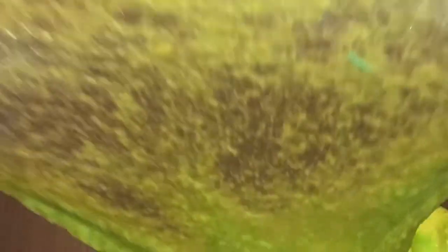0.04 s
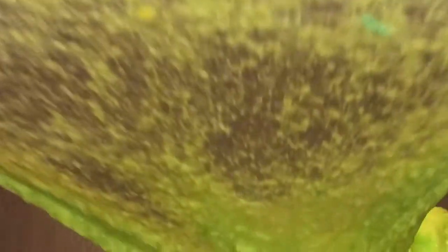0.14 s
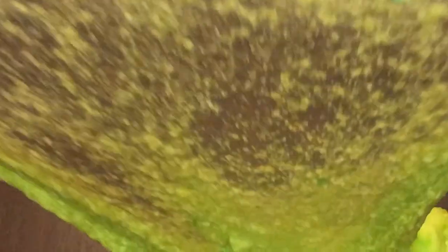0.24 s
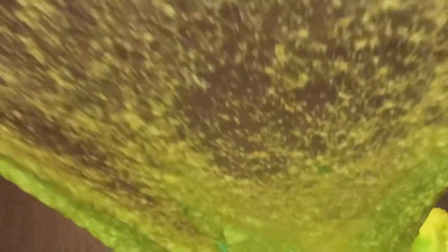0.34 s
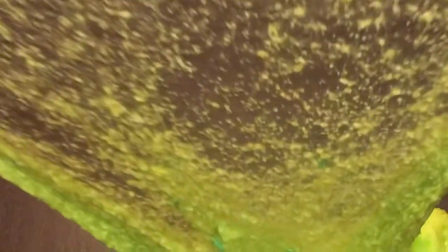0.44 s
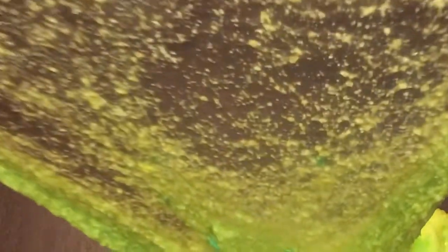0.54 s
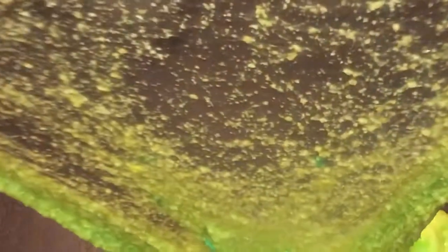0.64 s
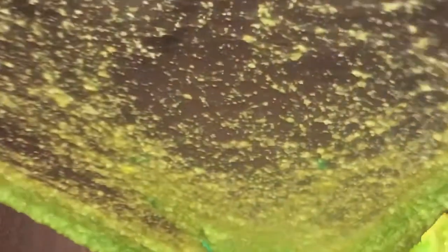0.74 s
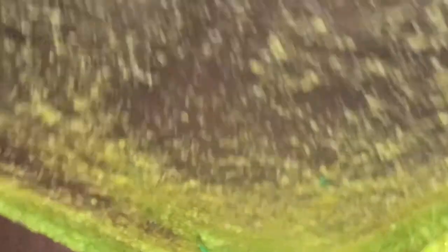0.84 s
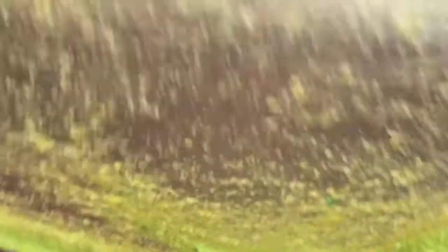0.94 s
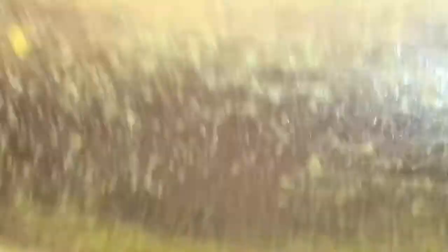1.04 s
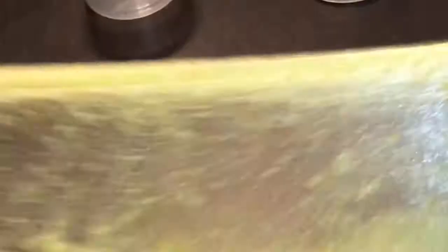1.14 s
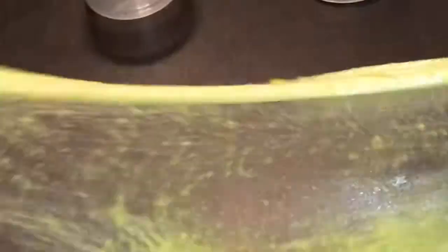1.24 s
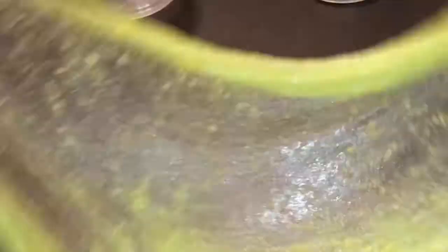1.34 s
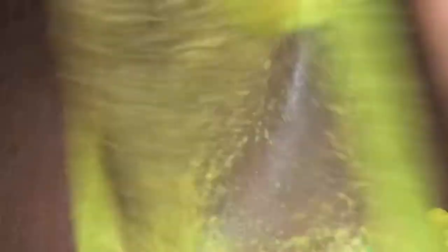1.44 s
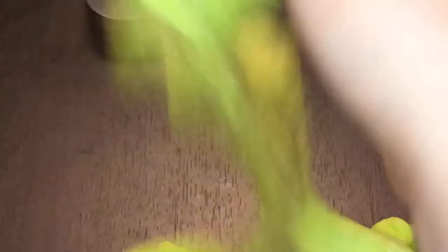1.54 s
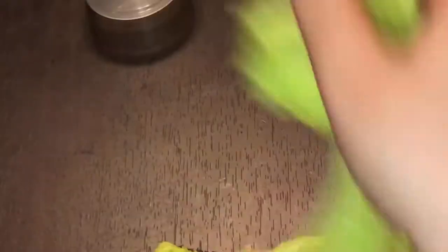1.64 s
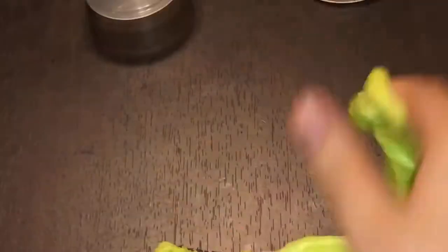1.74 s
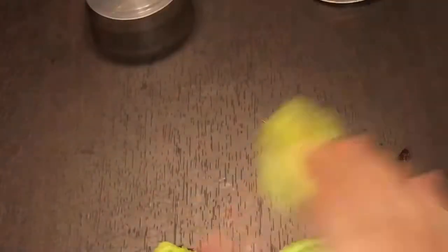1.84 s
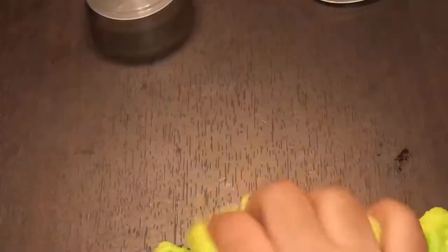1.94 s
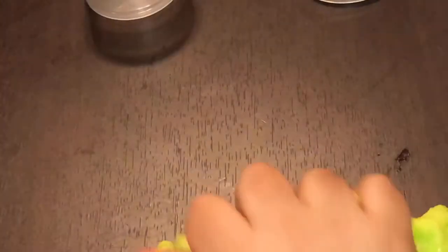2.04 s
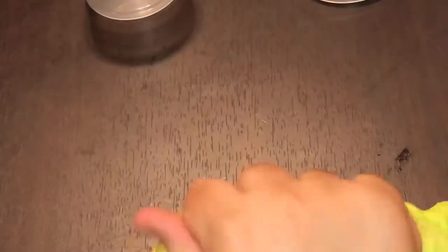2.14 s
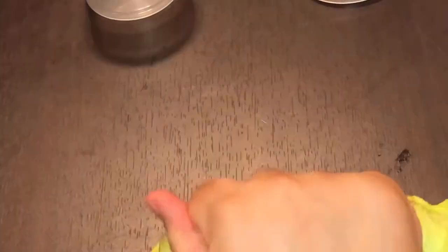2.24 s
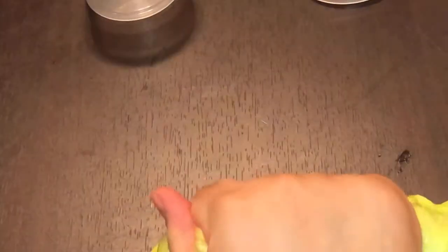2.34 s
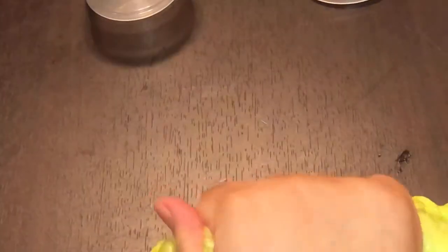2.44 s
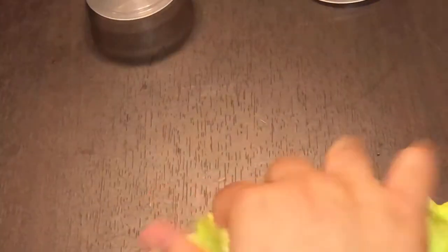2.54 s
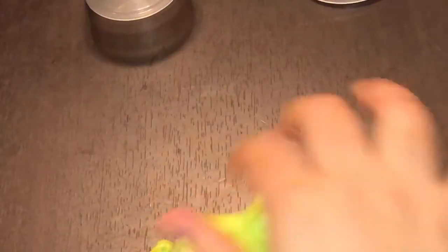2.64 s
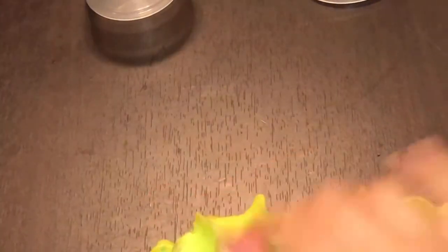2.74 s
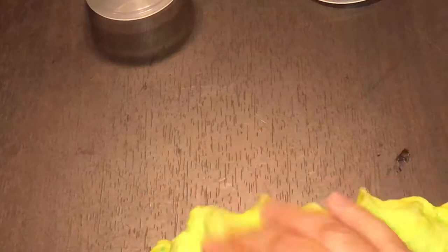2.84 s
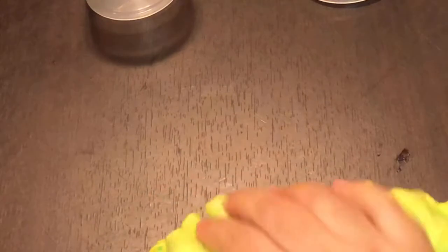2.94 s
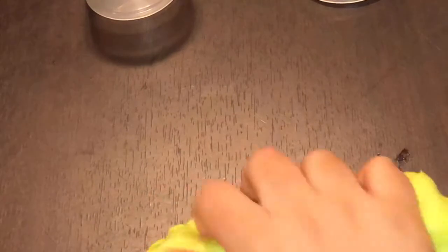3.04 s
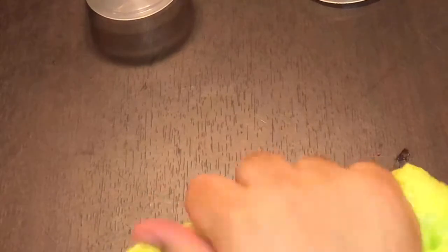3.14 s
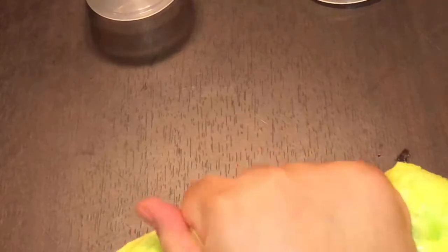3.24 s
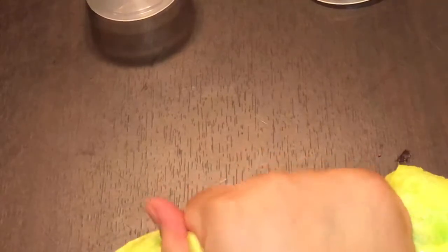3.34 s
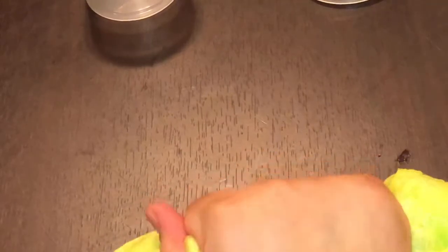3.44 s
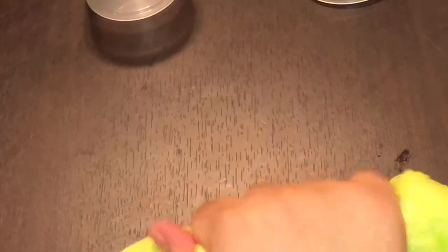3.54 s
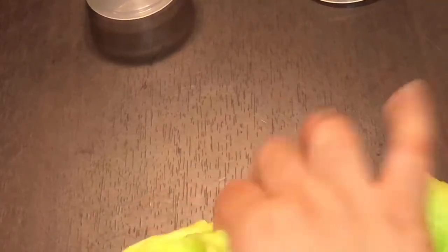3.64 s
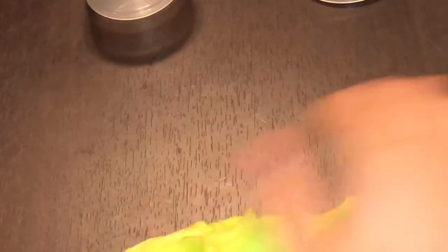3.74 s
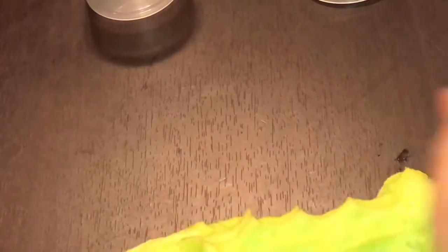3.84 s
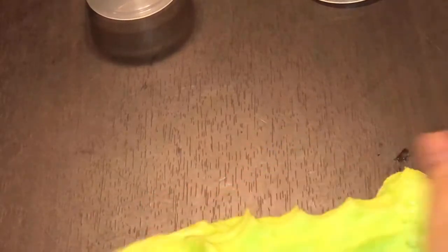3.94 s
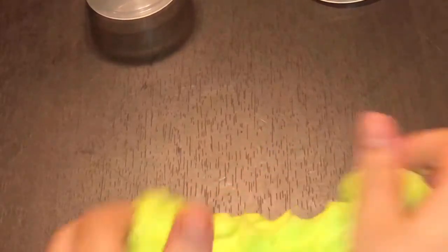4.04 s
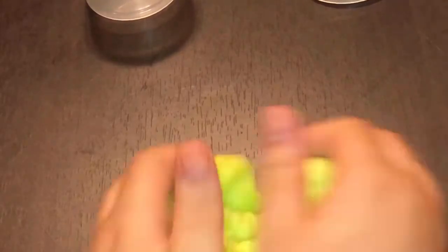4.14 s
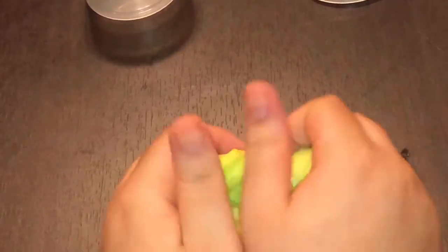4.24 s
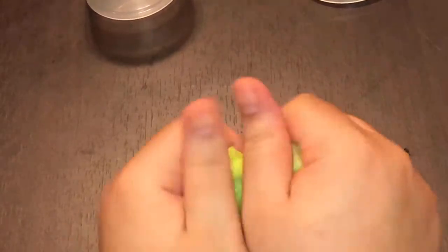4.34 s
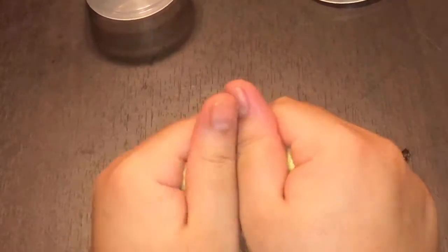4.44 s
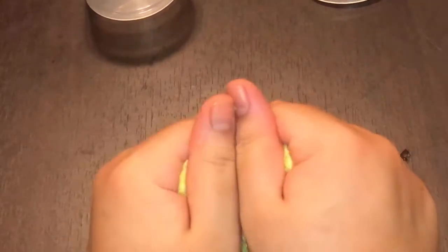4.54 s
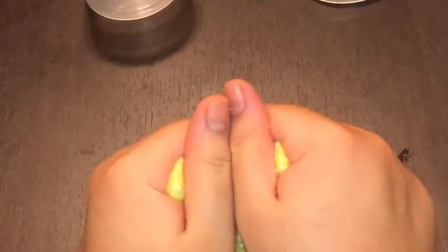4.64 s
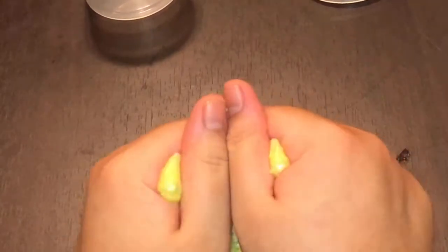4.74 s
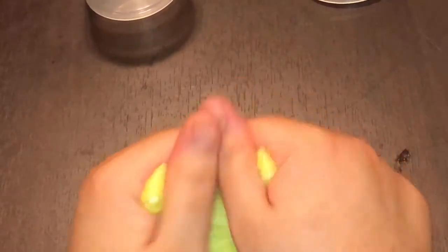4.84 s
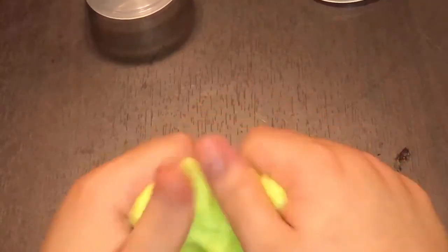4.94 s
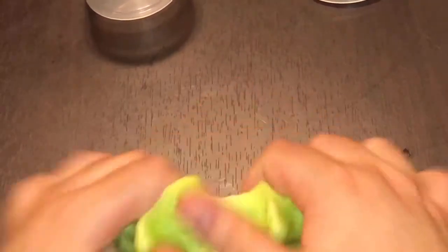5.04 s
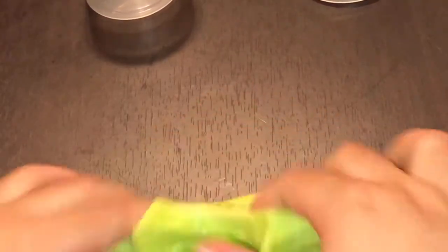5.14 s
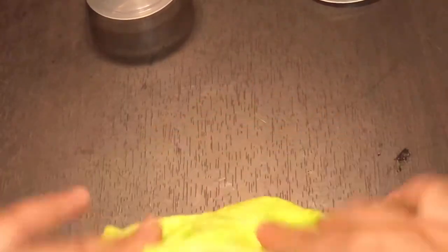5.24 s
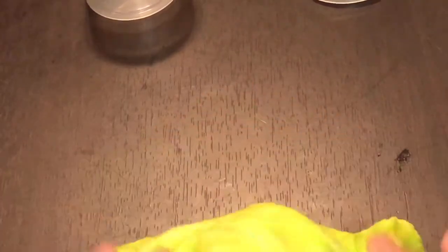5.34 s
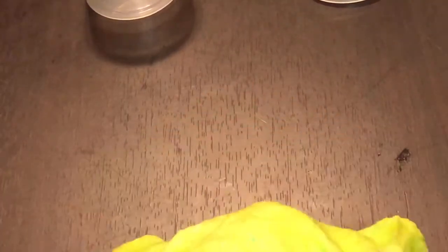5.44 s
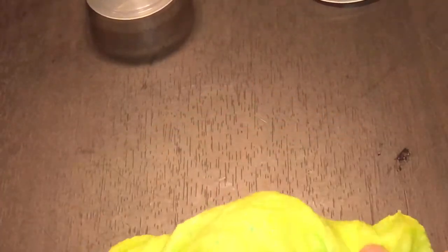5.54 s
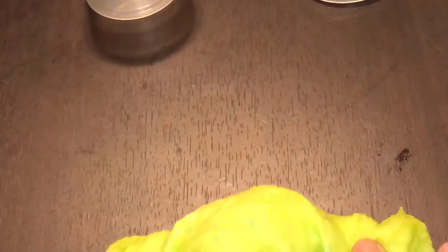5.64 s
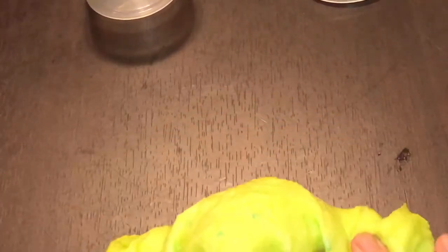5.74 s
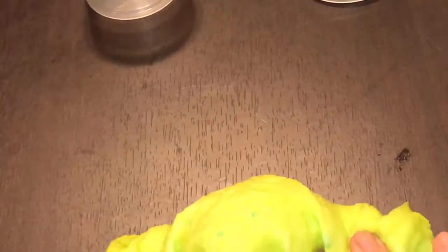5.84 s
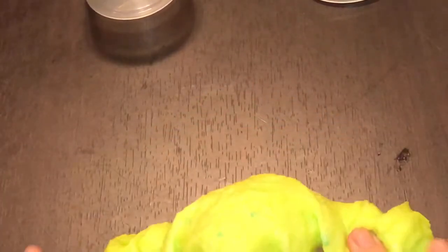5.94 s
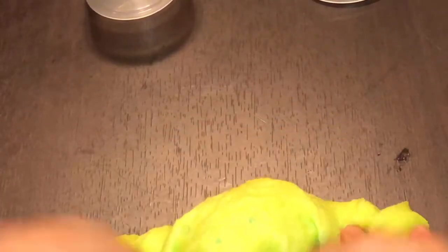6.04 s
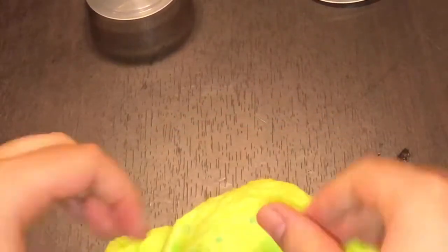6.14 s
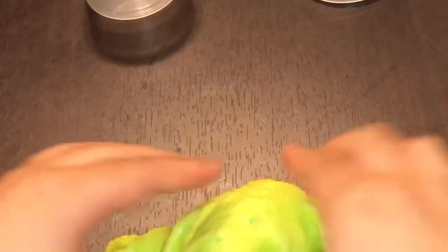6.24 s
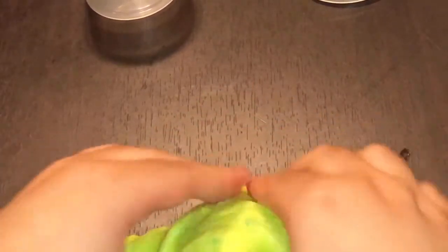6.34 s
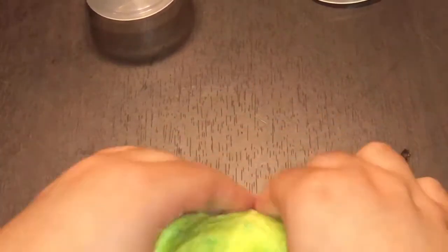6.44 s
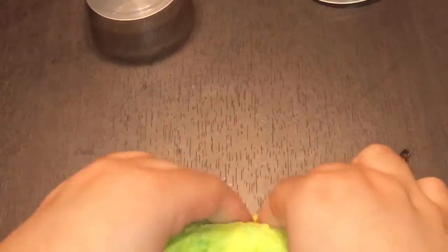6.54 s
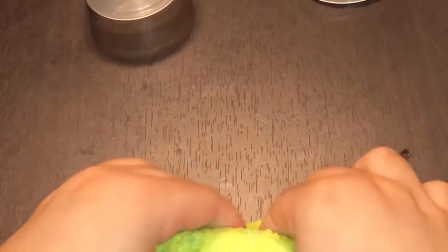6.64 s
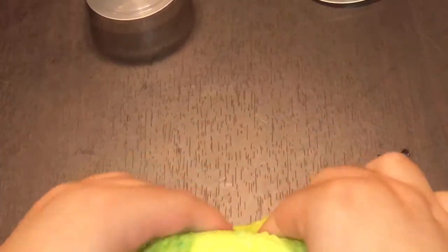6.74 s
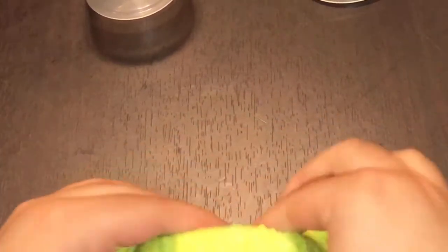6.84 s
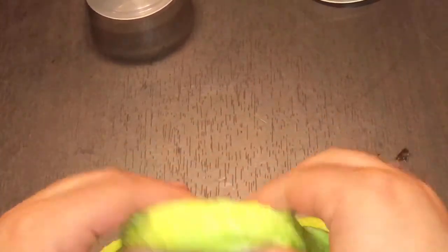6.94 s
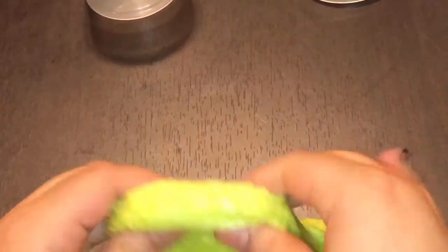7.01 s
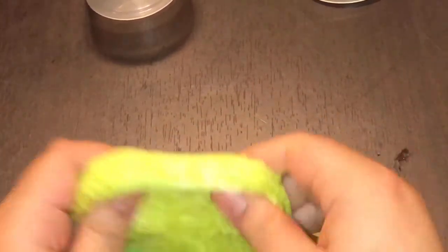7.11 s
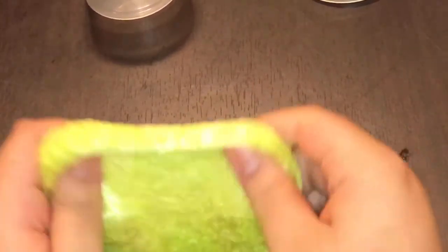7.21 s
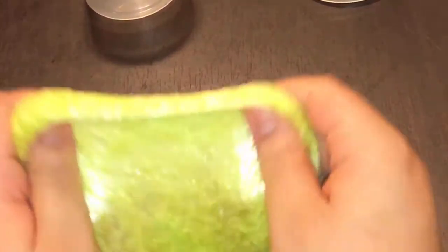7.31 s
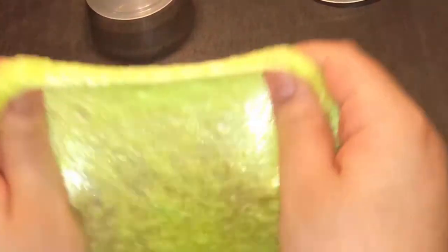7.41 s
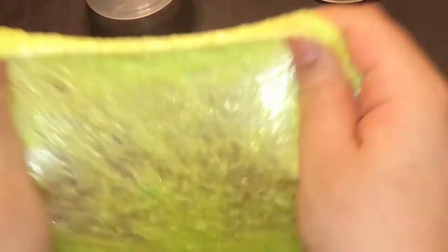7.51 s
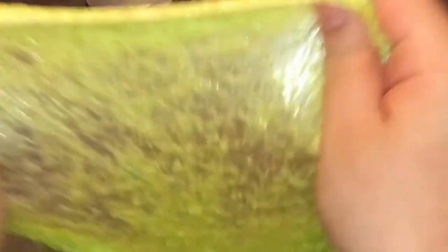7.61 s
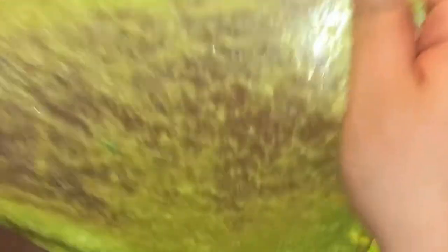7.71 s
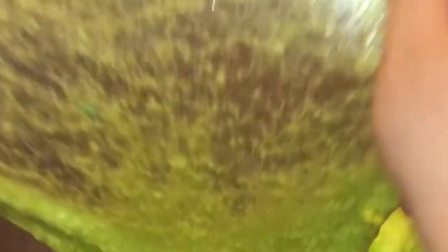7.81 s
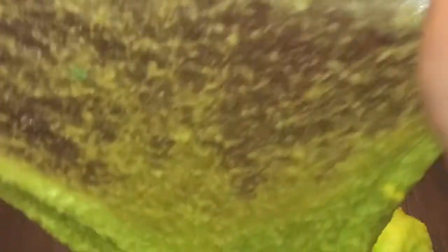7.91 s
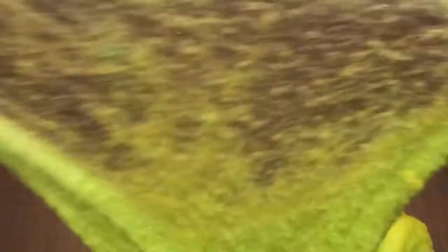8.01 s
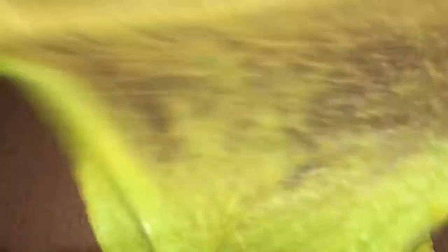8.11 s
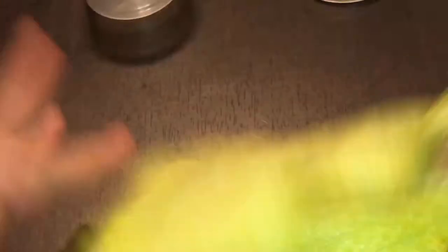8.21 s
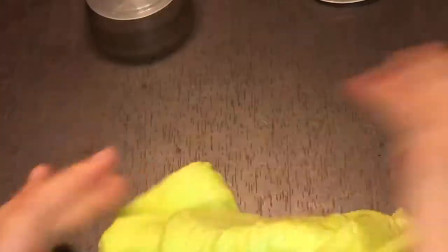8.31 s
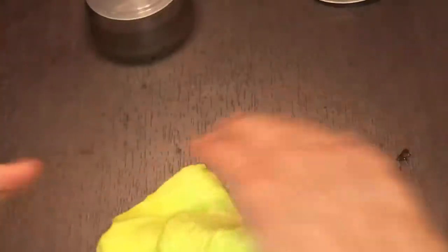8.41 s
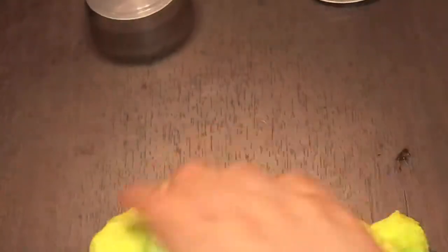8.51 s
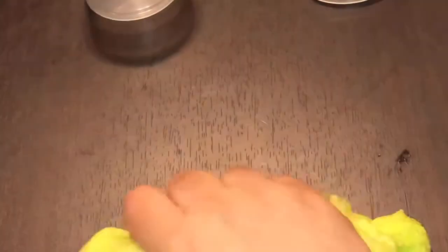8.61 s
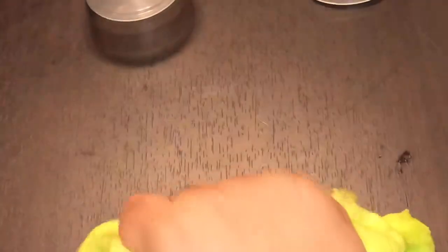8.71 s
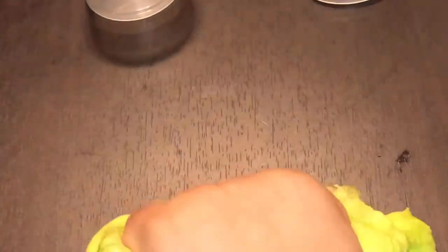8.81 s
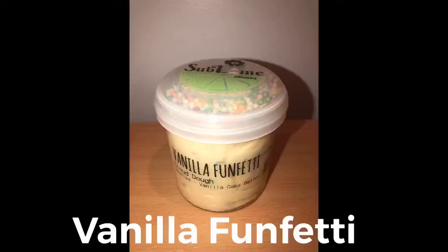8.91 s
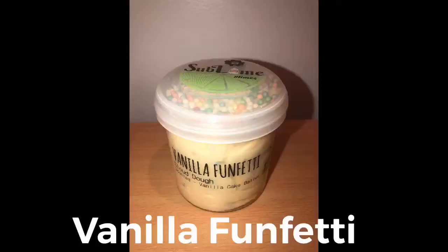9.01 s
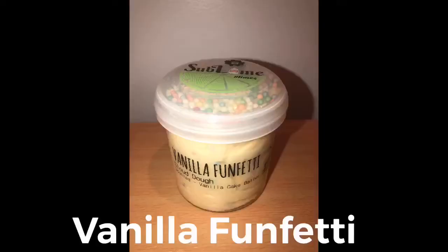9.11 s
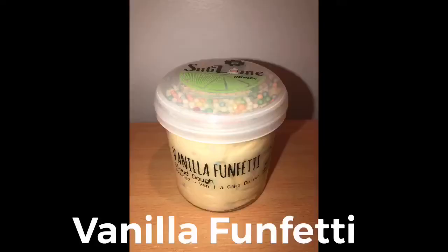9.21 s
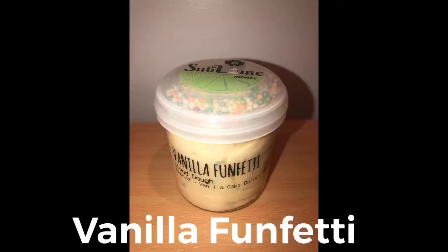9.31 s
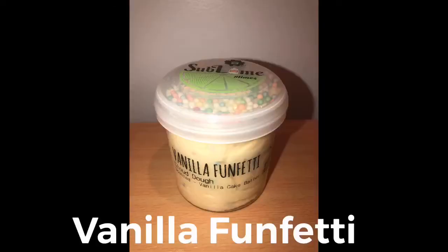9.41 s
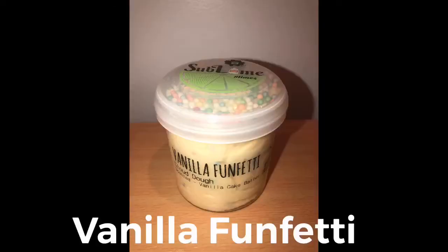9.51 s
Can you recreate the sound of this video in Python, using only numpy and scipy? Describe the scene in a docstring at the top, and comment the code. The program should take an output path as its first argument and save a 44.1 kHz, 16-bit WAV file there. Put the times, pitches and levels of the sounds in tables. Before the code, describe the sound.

Close pickup in a small, quiet room with faint low rumble. From 0 to 1 s a stretched slime sheet gives only sparse dry ticks and soft crackle; around 1 to 1.9 s some clearer pops and a very low, sinking flutter. At 2.05-2.25 s a hard press crushes it: a dense, bright burst of sharp snaps with a brief squeak. Soft crackling continues, then a shorter, fuller crunch with a woody knock at 3.3 s. A low muffled pat comes at 3.9 s, sticky peeling ticks at 4.2 s, and a longer crackling squeeze from 4.3 to 4.6 s, easing into squishes by 5 s. Light peeling ticks and a soft low pat follow to 6.1 s. A small cluster of pops rises at 6.4 s, then sparse faint ticks during stretching from 7 to 8.4 s. A final loud, crisp crunch hits at 8.7-8.8 s; at about 8.9 s everything cuts to total silence.

```python
"""Faint dry ticks and soft crackle come first, close to the microphone; then crunchy slime is kneaded harder on a
wooden table. Kneading and crackle are swarms of tiny damped rings; single air pockets snap in pops, loud and faint,
and the tabletop answers each with a short falling chirp. Squishes, a squeak, blips, a low hand pat and a thump are
noise through a gliding resonance. The stretched sheet flutters with a low sinking tone.
A quiet room of shaped noise lies below. All sound stops shortly before the end."""
import sys
import numpy as np
from scipy import signal
from scipy.fft import rfft, irfft, next_fast_len
from scipy.io import wavfile
from scipy.ndimage import uniform_filter1d, map_coordinates

SR = 44100
rng = np.random.default_rng(int(sys.argv[2]) if len(sys.argv) > 2 else 0)


def bounce(signal):
    """Save signal as a 16-bit WAV file at the path given by the first command-line argument."""
    frames = np.transpose(np.atleast_2d(signal))
    limited = np.clip(frames, -1, 1)
    pcm = np.round(limited * 32767).astype(np.int16)
    wavfile.write(sys.argv[1], SR, pcm)


N = 422037
TOP_HZ = 16000  # upper band limit
KNOCK_DB = -9  # table knock, relative to a small pop's snap or to the middle level of peel ticks


def amp(db):
    """Decibels to gain."""
    return 10 ** (np.asarray(db) / 20)


def unit(x):
    """Scale to rms 1."""
    return x / np.sqrt(np.mean(x ** 2) + 1e-20)


def unit_energy(x):
    """Scale to a sum of squares of 1."""
    return x / (np.linalg.norm(x) + 1e-12)


def along(points, hz):
    """Read (Hz, value) points on a log frequency axis."""
    f, v = np.transpose(points)
    return np.interp(np.log(hz + 1), np.log(f), v)


def curves(rows):
    """One value per sample for each column after the time."""
    s, *cols = np.transpose(rows)
    return [np.interp(np.arange(N) / SR, s, c) for c in cols]


def wobble(rate):
    """A smooth random curve, rate knots a second."""
    knots = rng.standard_normal(int(N * rate / SR) + 4)
    return map_coordinates(knots, [np.arange(N) * rate / SR])


def filtered(x, response):
    """x times a complex response of frequency."""
    size = next_fast_len(len(x) + 4096)
    spectrum = rfft(x, size) * response(np.fft.rfftfreq(size, 1 / SR))
    return irfft(spectrum, size)[:len(x)]


def coloured(x, colour):
    """x shaped by a table of (Hz, dB) points."""
    return filtered(x, lambda hz: amp(along(colour, hz)))


def bending(hz, lag_cycles):
    """Low bending waves travel slowest: each frequency arrives some of its own cycles late."""
    return np.exp(-2j * np.pi * lag_cycles * np.log((hz + 1) / SR))


def swell(s, rise_s, hold_s, fall_s):
    """Power of one hand movement: it rises, holds and dies away, 20 dB per rise or fall time."""
    t = np.arange(N) / SR - s
    away = np.maximum(-t, 0) / rise_s + np.maximum(t - hold_s, 0) / fall_s
    return np.exp(-2 * np.log(10) * np.minimum(away, 10))


def handling():
    """Crushes and strokes add in power: dB of squelch, crunch and fizz, and the tilt of the fizz."""
    # a fold gives way at once and its bubbles are crushed; levels are drives that kneading trims
    # columns: t/s, squelch level/dB, crunch level/dB, fizz level/dB, top-octave tilt/dB
    crushes = [(0.599, -62, -72, -81, -3.5), (1.453, -56, -55, -63, -1), (2.041, -59, -46, -50, -9),
               (2.127, -35.5, -33, -27, -10), (2.208, -42.5, -38.5, -37, 5), (2.239, -52, -43.5, -34, 4.5),
               (3.14, -76, -48.5, -43, -8.5), (3.294, -35, -27, -33, -2), (3.86, -46.5, -55, -69, -3),
               (4.352, -44, -38, -48.5, 1), (4.453, -53, -53.5, -39, 3), (4.573, -51.5, -40, -35, 3),
               (6.441, -61, -56.5, -50, 4), (6.598, -59.5, -63.5, -60.5, -3), (8.074, -65, -58.5, -64, 2),
               (8.214, -57, -58.5, -58.5, -2.5), (8.723, -41, -35, -27.5, 1),
               (8.801, -45, -45.5, -43.5, -3)]
    # slow presses and pulls of the hands, with the same drives
    # columns: t at full force/s, rise/s, hold/s, fall/s, squelch level/dB, crunch level/dB, fizz level/dB
    strokes = [(0.003, 0.069, 0.375, 0.26, -74.5, -70.0, -70.5),
               (1.008, 0.061, 0.102, 0.13, -63, -51.5, -52.5),
               (1.298, 0.809, 0.177, 0.57, -70.5, -68.0, -66.5),
               (1.648, 0.081, 0.168, 0.071, -69.5, -68.5, -62),
               (2.032, 0.163, 0.073, 0.075, -59, -55.0, -58.5),
               (2.461, 0.056, 0.078, 0.13, -45, -49.0, -50.5),
               (2.702, 0.132, 0.051, 0.13, -76, -69.5, -62.5),
               (2.932, 0.079, 0.36, 0.23, -61, -58.0, -60.0), (3.52, 0.021, 0.094, 0.12, -46, -49.0, -51),
               (3.991, 0.123, 0.123, 0.25, -56, -54.5, -56), (4.369, 0.269, 0.183, 0.27, -62, -49.5, -48.0),
               (4.846, 0.08, 0.205, 0.21, -51, -53, -51.5), (5.229, 0.11, 0.034, 0.18, -74, -71, -61.0),
               (5.394, 0.08, 0.192, 0.09, -71.5, -70.5, -72),
               (5.639, 0.021, 0.063, 0.12, -62.0, -64.0, -71),
               (5.991, 0.054, 0.054, 0.144, -50.5, -54, -50.5),
               (6.361, 0.07, 0.141, 0.27, -63.5, -64.5, -62.5),
               (6.716, 0.124, 0.089, 0.209, -58.5, -65, -60.5), (7.137, 0.6, 0.647, 0.32, -71, -67, -65),
               (7.901, 0.178, 0.022, 0.22, -62, -56.0, -56), (8.076, 0.035, 0.076, 0.55, -69, -64.0, -64.5),
               (8.571, 0.162, 0.116, 0.045, -56.5, -52.5, -58.5)]
    crush_rise_s, crush_hold_s, crush_fall_s = .017, .01, .118  # rise and fall are times per 20 dB
    stroke_tilt_db = -3.5  # top octave of the fizz in a slow stroke
    resting_db = -84  # foam left alone barely ticks
    moves = []
    for s, *levels, tilt in crushes:
        moves.append((swell(s, crush_rise_s, crush_hold_s, crush_fall_s), levels, tilt))
    for s, rise, hold, fall, *levels in strokes:
        moves.append((swell(s, rise, hold, fall), levels, stroke_tilt_db))
    shapes, levels_db, tilts_db = map(np.array, zip(*moves))
    peaks = amp(levels_db.T) ** 2
    power = peaks @ shapes + amp(resting_db) ** 2
    squelch_db, crunch_db, fizz_db = 10 * np.log10(power)
    # each movement tilts the fizz by its share of the fizz power
    tilt_db = (peaks[-1] * tilts_db) @ shapes / power[-1]
    return squelch_db, crunch_db, fizz_db, tilt_db


def bubbles(rate, ring_hz, cycles, spread_db, count=96):
    """A swarm of tiny damped rings of random pitch and size, held near rms 1 from moment to moment."""
    n = int(rate * N / SR)
    start = rng.integers(0, N, (n, 1))
    hz = np.minimum(ring_hz * np.exp(.5 * rng.standard_normal((n, 1))), TOP_HZ)
    size = amp(spread_db * np.minimum(rng.exponential(size=(n, 1)), 5))
    turns = hz * np.arange(count) / SR
    rings = size * np.sin(2 * np.pi * turns) * np.exp(-turns / cycles)
    places = start + np.arange(count)
    swarm = np.bincount(places.ravel(), rings.ravel(), N + count)[:N]
    local_power = np.abs(uniform_filter1d(swarm ** 2, size=1800))
    return swarm / np.sqrt(local_power + 1e-9)


def crackle(level_db, colour, sparse, dense, crowded_db):
    """The harder the squeeze, the more bubbles burst at once, until single ticks start to merge."""
    dense_share = .2 + .45 / (1 + amp(crowded_db - level_db))
    swarm = np.sqrt(1 - dense_share) * sparse + np.sqrt(dense_share) * dense
    return amp(level_db) * unit(coloured(swarm, colour))


def patchy(x, depth_db):
    """Folds of slime favour shifting bands: a smooth random gain over frequency and time."""
    z = signal.stft(x, nperseg=512)[2]
    patch = np.outer(np.hanning(13), np.hanning(11))
    field = signal.fftconvolve(rng.standard_normal(z.shape), patch, "same")
    return signal.istft(z * amp(depth_db * unit(field)), nperseg=512)[1][:N]


def kneading(squelch_db, crunch_db, fizz_db, tilt_db):
    """Large, middling and tiny bubbles collapse in the foam; the large ones sound through the table."""
    # colour of the soft squelch in the tabletop; columns: f/Hz, level/dB per Hz
    squelch_colour = [(90, -29.5), (140, -15.5), (200, -1.5), (295, -.5), (380, -1), (480, -1), (620, 1),
                      (800, -4.5), (1050, -4.5), (1600, -46.5)]
    # colour of the middling bubbles; columns: f/Hz, level/dB per Hz
    crunch_colour = [(600, -28), (1050, -11.5), (1300, -3.5), (2000, -3), (3100, -1), (4000, 2), (5500, -2),
                     (8000, -29)]
    # colour of the tiny bubbles before the tilt; columns: f/Hz, level/dB per Hz
    fizz_colour = [(3500, -19), (5200, -6.5), (7000, -5.5), (10000, -6), (13000, -2.5), (15800, -0.5)]
    large = bubbles(rate=900, ring_hz=900, cycles=0.89, spread_db=1.5)
    large = filtered(coloured(large, squelch_colour), lambda hz: bending(hz, lag_cycles=1.7))

    sparse = bubbles(800, 2600, cycles=0.95, spread_db=3.0)
    dense = bubbles(5000, 2600, cycles=1.4, spread_db=0.5)
    middling = crackle(crunch_db, crunch_colour, sparse, dense, crowded_db=-64)

    sparse = bubbles(1800, 9000, cycles=0.47, spread_db=0.5)
    dense = bubbles(8000, 9000, cycles=0.8, spread_db=-1)
    tiny = crackle(fizz_db, fizz_colour, sparse, dense, crowded_db=-66)
    finest = filtered(tiny, lambda hz: 1 / (1 + (10500 / (hz + 1)) ** 8))  # above about 10.5 kHz
    tiny = amp(tilt_db / 2) * finest + amp(-tilt_db / 2) * (tiny - finest)

    # one bursting bubble sets off its neighbours, so the crackle comes in clumps; the grip is never quite even
    clumps = amp(0.59 * wobble(70) + 1.2 * wobble(14))
    squelch = amp(squelch_db - 0.6) * unit(large)
    crunch = amp(-2) * patchy(middling, depth_db=2.0)
    fizz = amp(-0.15) * patchy(tiny, depth_db=2.0)
    return clumps * (squelch + crunch + fizz)


def pocket_response(hz, ring_hz):
    """A small pocket rings higher and radiates little bass; its soft wall smears and dulls the snap."""
    resonance = 1 / (1 + .9j * (hz / ring_hz - ring_hz / (hz + 1)))
    radiation = 1 / (1 - 900j / (hz + 1)) ** 2
    wall = bending(hz, lag_cycles=.55) / (1 + (hz / (3 * ring_hz)) ** 4)
    return resonance * radiation * wall * (hz < TOP_HZ)


def pops(rows):
    """A pocket snaps open and rings a few cycles, its torn wall spatters, and the table chirps."""
    # a pop's knock in the tabletop; columns: f/Hz, level/dB per Hz
    knock_colour = [(100, -29.5), (200, -9), (310, -3), (520, 6.5), (750, -1), (1050, -14), (1600, -2.5),
                    (3000, -10.5), (6000, -40)]
    t = np.arange(SR // 25) / SR
    out = np.zeros(N + len(t))
    strike = 1. * (t == 0)
    for s, snap_db, ring_hz, knock_db in rows:
        spatter = unit_energy(rng.standard_normal(len(t)) * np.exp(-t / .0007) * (t > .0003))
        # the foam around it crackles on for a few milliseconds
        settling = unit_energy(rng.standard_normal(len(t)) ** 3 * np.exp(-t / .006))
        burst = strike + amp(-4) * spatter + amp(-13.5) * settling
        snap = unit_energy(filtered(burst, lambda hz: pocket_response(hz, ring_hz)))
        # each pop strikes the table at another distance from the microphone
        lag_cycles = 1.7 * np.exp(.13 * rng.standard_normal())
        knock = filtered(strike, lambda hz: amp(along(knock_colour, hz)) * bending(hz, lag_cycles))
        out[round(s * SR):][:len(t)] += amp(snap_db) * snap + amp(knock_db) * unit_energy(knock)
    return out[:N]


def small_pops(crackle_db):
    """Small pockets burst at random for pops(): harder crackle brings more and louder ones."""
    gentle_db = -63  # crackle level at which the next settings hold
    per_s, doubles_db = 11, 8  # pops a second, and the dB of crackle that double them
    snap_energy_db, grows, spread_db = -39.5, 0.65, 5.5  # grows: dB of snap per dB of crackle
    middle_ring_hz = 4400  # pitches spread an octave either way
    effort_db = crackle_db - gentle_db
    due = np.cumsum(per_s * 2 ** (effort_db / doubles_db)) / SR  # pops due so far
    draws = rng.random((700, 3))  # at most 700 pops
    at = np.searchsorted(due, np.arange(len(draws)) + draws[:, 0])
    heard = at < N
    at = at[heard]
    _, size, pitch = 2 * draws[heard].T - 1
    snap_db = snap_energy_db + grows * effort_db[at] + spread_db * size
    return list(zip(at / SR, snap_db, middle_ring_hz * 2 ** pitch, snap_db + KNOCK_DB))


def peel_ticks():
    """Threads of slime let go of the fingers one by one, as random rows for pops()."""
    # sticky slime peels off the skin in dry ticks
    # columns: t/s, length/s, ticks per s, middle snap energy level/dB
    peels = [(0.103, .3, 8, -42.5), (4.169, .17, 33, -32), (5.371, .36, 32, -40.5), (6.333, .2, 35, -31),
             (7.301, .52, 16, -35.5)]
    middle_ring_hz, spread_db = 7050, 5
    rows = []
    for s, length, rate, db in peels:
        for k, (jitter, size, pitch) in enumerate(rng.uniform(-1, 1, (24, 3))):
            after = (k + .5 + .5 * jitter) / rate
            if after < length:
                rows.append((s + after, db + spread_db * size, middle_ring_hz * 2 ** pitch, db + KNOCK_DB))
    return rows


def gliding_noises():
    """Noise rings in a resonance that glides in pitch, with random spurts of level."""
    # short gliding noises: air squishes, a squeak, blips, a low hand pat and a thump
    # the level is before a 3 dB trim
    # columns: t/s, length/s, first f/Hz, last f/Hz, width as a share of the pitch, level/dB
    glides = [(0.277, .021, 2640, 1200, 0.33, -63.5), (0.312, 0.037, 1860, 717, 0.33, -61.5),
              (0.595, .044, 1298, 385, 0.47, -61.5), (0.992, 0.049, 3100, 2960, 0.18, -51),
              (1.461, .028, 718, 333, 0.26, -53), (1.64, .037, 2210, 2110, 0.22, -60),
              (2.037, .011, 4500, 2960, .03, -42), (2.047, 0.045, 3120, 5400, .06, -41),
              (2.126, 0.011, 2774, 3210, .062, -24), (3.203, 0.0056, 2060, 1900, 0.072, -37.5),
              (3.29, 0.044, 3100, 2880, 0.16, -31.5), (3.293, 0.047, 1416, 1786, 0.5, -35.5),
              (3.847, 0.073, 1807, 1547, 0.23, -55), (3.893, 0.042, 221, 210, 0.13, -50.5),
              (4.836, 0.082, 2500, 2486, 0.49, -47), (5.001, .07, 622, 670, 0.13, -47.5),
              (5.169, .11, 695, 720, 0.18, -61), (5.633, 0.0067, 3540, 900, 0.25, -56),
              (6.029, 0.102, 302, 260, 0.43, -51.5), (6.736, .12, 3680, 3690, .12, -65),
              (7.967, 0.019, 3900, 3050, 0.25, -51.5), (8.212, 0.013, 2585, 695, 0.76, -47),
              (8.802, .006, 645, 448, .1, -31.5)]
    out = np.zeros(N)
    spurts = amp(1.6 * wobble(220))
    flutter = np.exp(.06 * wobble(90))
    for s, length, first_hz, last_hz, width, db in glides:
        u = np.linspace(0, 1, int(length * SR))
        span = round(s * SR) + np.arange(len(u))
        hz = np.geomspace(first_hz, last_hz, len(u)) * flutter[span]
        memory = np.exp(-np.pi * width * hz.mean() / SR)
        noise = rng.standard_normal(len(u)) + 1j * rng.standard_normal(len(u))
        # the noise rings around zero frequency and is then shifted up to the gliding pitch
        ringing = signal.lfilter([1], np.poly([memory, memory ** 2]), noise)
        tone = np.real(ringing * np.exp(2j * np.pi * np.cumsum(hz) / SR))
        out[span] += amp(db - 3.0) * unit(tone * spurts[span] * np.sqrt(u * (1 - u)))
    return out


def sheet():
    """The thin sheet flutters like a slackening drum skin: a sine of sinking, unsteady pitch."""
    # the sheet slackens as it is pulled; pitch and level waver around these
    # columns: t/s, f/Hz, level/dB
    slackening = [(.84, 92, -91), (.92, 83, -55), (1.05, 73.6, -63), (1.18, 68.4, -55), (1.27, 60.2, -65),
                  (1.38, 56.5, -59.5), (1.6, 50.9, -69), (1.8, 49.5, -58.5), (1.95, 47.5, -69)]
    hz, level_db = curves(slackening)
    phase = 2 * np.pi * np.cumsum(hz) / SR + .35 * wobble(13.3)
    sounding = np.arange(N) < slackening[-1][0] * SR
    return amp(level_db + 2.4 * wobble(11.1)) * unit(np.sin(phase)) * sounding


def tabletop(x):
    """The wooden top goes on ringing in its low modes."""
    # faint modes of the tabletop; columns: f/Hz, relative level/dB, t60/s
    table_modes = [(221, -2.5, 0.47), (320, -4.5, .13), (449.5, -5.5, 0.17), (578, -5.5, 0.076)]
    t = np.arange(SR // 4) / SR
    ring = sum(amp(db - 60 * t / t60) * np.sin(2 * np.pi * hz * t) for hz, db, t60 in table_modes)
    return signal.fftconvolve(x, unit_energy(ring))[:N]


def room(x):
    """A small room's tail of decaying noise, longer in the treble."""
    # decay of the room; columns: f/Hz, t60/s
    room_decay = [(200, 0.1), (2000, 0.24), (12000, 0.42)]
    hz, t, z = signal.stft(rng.standard_normal(SR // 3), SR, nperseg=256)
    decay = amp(-60 * t / along(room_decay, hz)[:, None])
    tail = signal.istft(z * decay, SR, nperseg=256)[1]
    delayed = np.pad(unit_energy(tail), (SR // 300, 0))  # starts 1/300 s late
    return signal.fftconvolve(x, delayed)[:N]


def room_tone():
    """Faint noise with a soft low emphasis, over a rumble that comes and goes."""
    # colour of the quiet room; columns: f/Hz, level/dB per Hz
    tone_colour = [(25, -30.5), (70, -4), (105, 4.5), (155, -1), (185, -2), (207, 6.5), (235, -6),
                   (290, -5.5), (500, -13), (1000, -18.5), (2500, -23.5), (8000, -28.5), (15800, -31)]
    # colour of the deep rumble; columns: f/Hz, level/dB per Hz
    rumble_colour = [(20, -28), (36, -14.5), (53, 2.5), (75, -1.5), (100, -8.5), (160, -23.5), (400, -61)]
    # rumble swells as the arms shift; columns: t of the peak/s, length/s, level/dB
    shifts = [(2.1, 1.1, -66.5), (2.801, .35, -62), (5.223, .22, -58), (5.9, .3, -65.5),
              (6.799, 0.4, -60.5), (8.306, .45, -62)]
    rumble_db = -69  # between the swells
    t = np.arange(N) / SR
    swells = sum(amp(db) ** 2 * np.exp(-(2 * (t - s) / length) ** 2) for s, length, db in shifts)
    tone = unit(coloured(rng.standard_normal(N), tone_colour))
    rumble = unit(coloured(rng.standard_normal(N), rumble_colour))
    return amp(-64.5) * tone + np.sqrt(amp(rumble_db) ** 2 + swells) * rumble


def scene():
    """The slime, close by, on a table in a quiet room."""
    # single pops placed by hand, loud and faint, low and high
    # columns: t/s, snap energy level/dB, ring f/Hz, table knock energy level/dB
    placed_pops = [(.3745, -31, 7660, -64), (1.043, -19.5, 6650, -43), (1.1, -21, 3770, -40),
                   (1.4444, -29.5, 3550, -45), (1.9832, -42, 2700, -23), (2.0353, -17.5, 2540, -28),
                   (2.0807, -5.5, 4400, -10), (2.0952, -3, 6110, -17), (2.099, -5, 4580, -16),
                   (2.1217, 5.5, 6250, -10.5), (2.13, -2, 3474, -4.5), (2.1339, 3.5, 7210, -1),
                   (2.1466, -1, 6540, -21), (2.1827, -10, 8790, -25), (2.1999, -8, 4730, -2),
                   (2.2126, -3, 10500, -26), (2.2277, -4, 7040, -16), (2.2359, -14, 3120, -14),
                   (2.2385, -4.5, 6650, -20), (2.2534, -0.5, 12470, -30), (2.4132, -29, 4010, -32),
                   (2.908, -26.5, 2750, -36), (2.9282, -23, 4900, -39), (3.0302, -24.5, 2035, -22),
                   (3.1373, -12.5, 5110, -25), (3.151, -18, 7350, -50), (3.2357, -20, 8000, -24.5),
                   (3.2631, -8.5, 10270, -10.5), (3.2823, 6, 3490, -1), (3.8576, -34.5, 1754, -19.5),
                   (4.0916, -16.5, 3680, -28), (4.14, -27, 5720, -26), (4.227, -20, 4550, -29.5),
                   (4.2699, -18.5, 5760, -51), (4.3, -17.5, 2480, -26), (4.307, -19, 2950, -34),
                   (4.3452, -17, 3830, -11), (4.3488, -4, 2097, -7), (4.3541, -12, 2750, -20),
                   (4.368, -14, 2965, -15), (4.4038, -11.5, 8350, -23), (4.414, -5, 8700, -21),
                   (4.4391, -3, 13140, -43.5), (4.4578, -5.5, 13500, -19), (4.4825, -3.5, 13700, -25),
                   (4.5176, -9.5, 6170, -17), (4.5366, -15, 9020, -56), (4.5546, -8.5, 7070, -10),
                   (4.5715, -5, 4270, -12), (4.6416, -22, 9390, -23), (4.8237, -25, 3770, -36),
                   (5.178, -45, 2640, -28), (5.3884, -26, 9350, -53), (5.431, -35.5, 3490, -35),
                   (5.478, -39, 9100, -48), (5.5664, -30.5, 5260, -48), (5.672, -32.5, 6850, -45.5),
                   (6.3239, -32.5, 10590, -58.5), (6.3641, -27, 2950, -28.5), (6.4075, -18, 5440, -27),
                   (6.4389, -4, 7000, -26), (6.464, -21, 5530, -38), (6.5362, -31, 10430, -32),
                   (6.5749, -26.5, 4960, -43), (6.5974, -24.5, 4140, -21.5), (6.6714, -33, 14050, -54),
                   (7.6048, -29.5, 4900, -42), (7.8394, -27, 5900, -51.5), (8.3963, -35, 11770, -35),
                   (8.5659, -14, 2145, -20.5), (8.6307, -24.5, 2477, -21), (8.662, -36, 2074, -17),
                   (8.6851, -11.5, 9110, -30), (8.7099, 2.5, 8950, -7.5), (8.7136, -4, 3360, -2.5),
                   (8.7383, 2, 10600, -9), (8.752, -3.5, 8610, -26), (8.8002, -7.5, 5200, -12.5)]
    squelch_db, crunch_db, fizz_db, tilt_db = handling()
    slime = kneading(squelch_db, crunch_db, fizz_db, tilt_db) + gliding_noises()
    bursts = list(placed_pops) + peel_ticks() + small_pops(np.maximum(crunch_db, fizz_db))
    slime = slime + pops(bursts)
    background = sheet() + room_tone()
    return (slime + amp(-30) * tabletop(slime) + amp(-21.5) * room(slime) + background)[None]


def record(dry):
    """The sound stops dead; the microphone drops the deepest bass, and treble falls steeply at the band limit."""
    stop_s, low_cut_hz = 8.882, 27
    stopped = dry[0] * (np.arange(N) < stop_s * SR)

    def band(hz):
        """Gain of the low cut and of the band limit."""
        low_cut = 1 / (1 + (low_cut_hz / (hz + 1)) ** 8)
        return low_cut / (1 + (hz / TOP_HZ) ** 120)

    return filtered(stopped, band)[None]


dry = scene()
out = record(dry)
bounce(out)
```